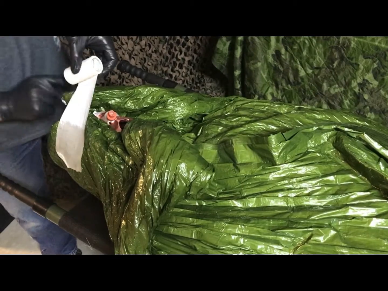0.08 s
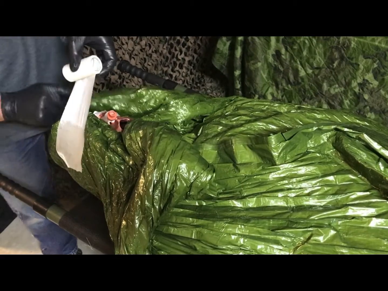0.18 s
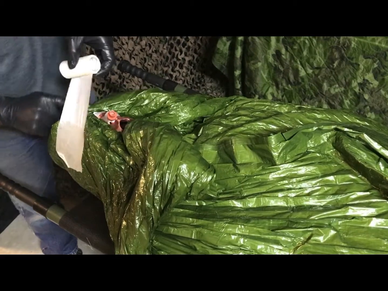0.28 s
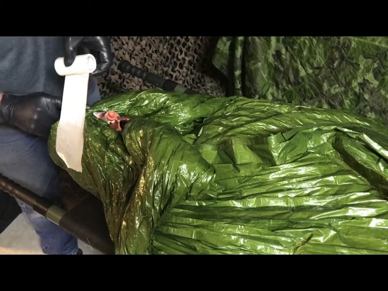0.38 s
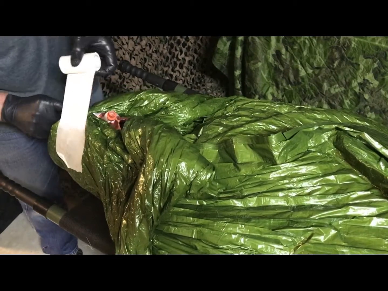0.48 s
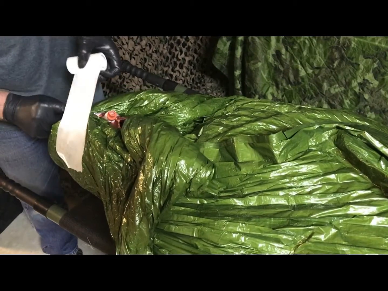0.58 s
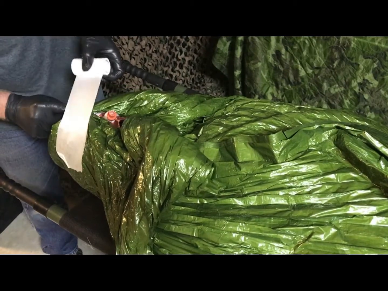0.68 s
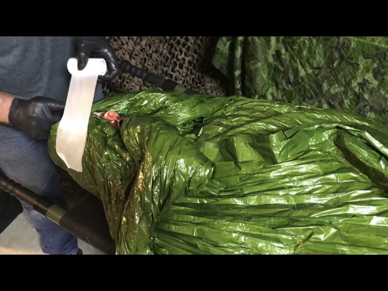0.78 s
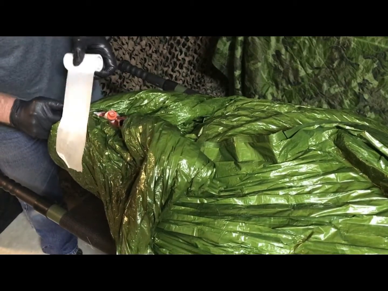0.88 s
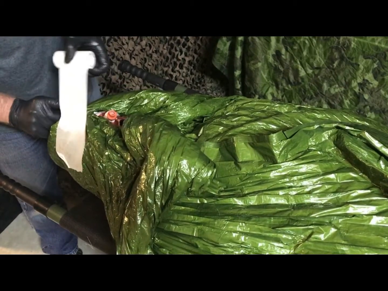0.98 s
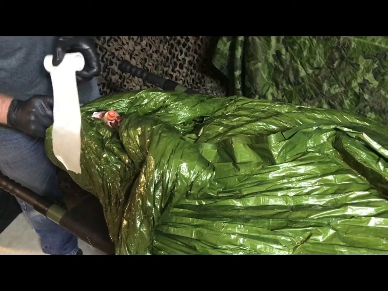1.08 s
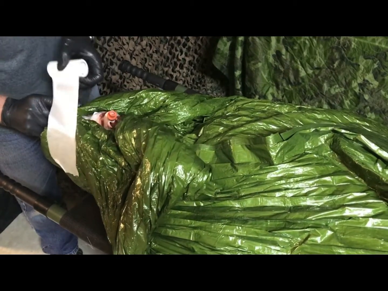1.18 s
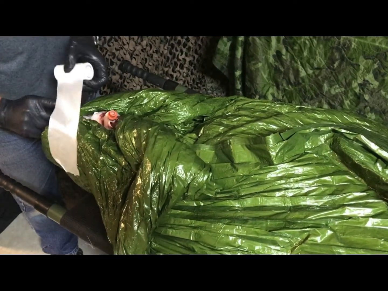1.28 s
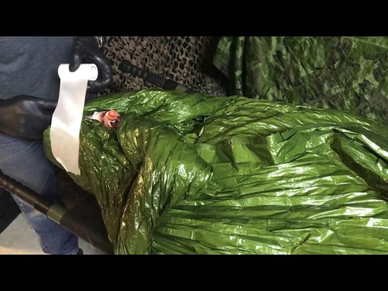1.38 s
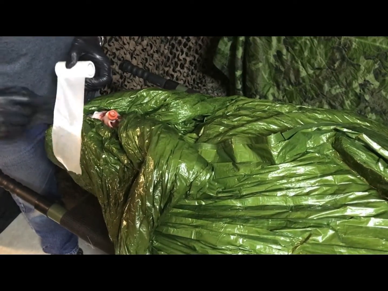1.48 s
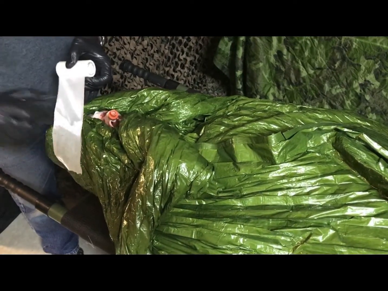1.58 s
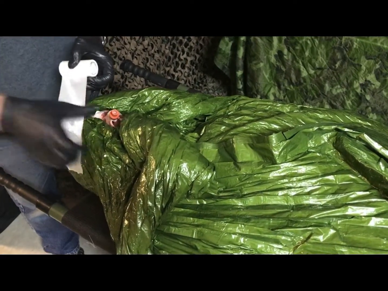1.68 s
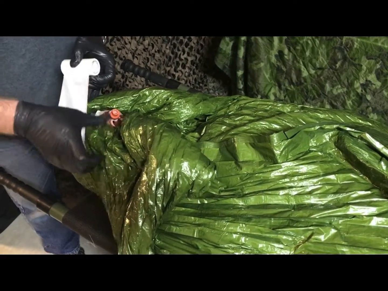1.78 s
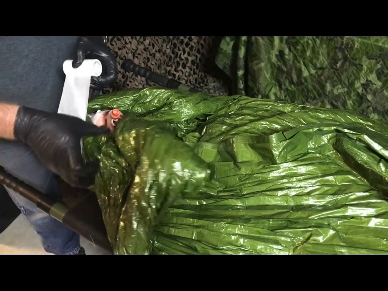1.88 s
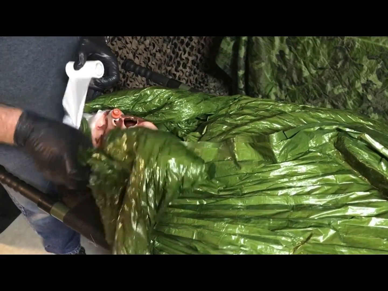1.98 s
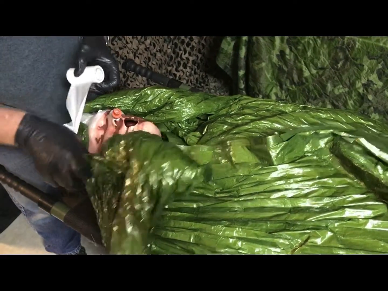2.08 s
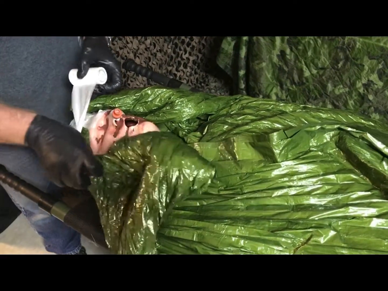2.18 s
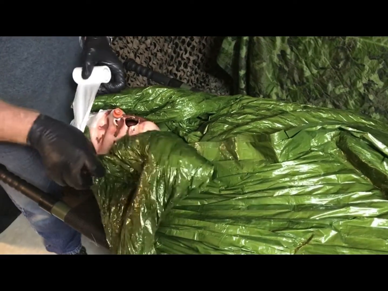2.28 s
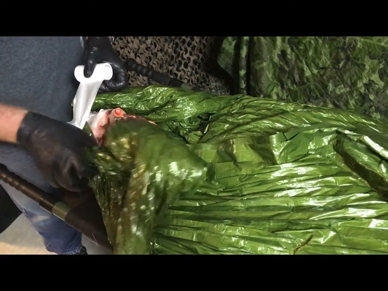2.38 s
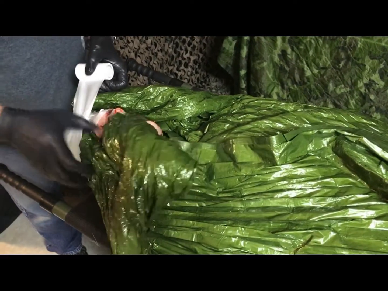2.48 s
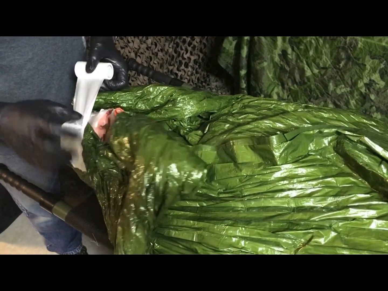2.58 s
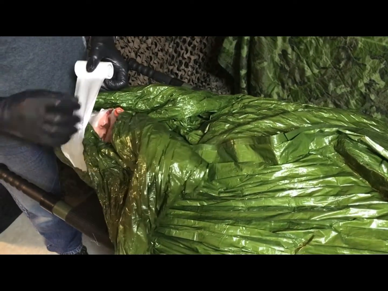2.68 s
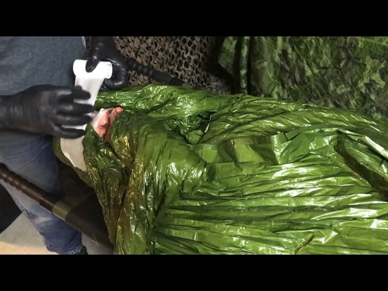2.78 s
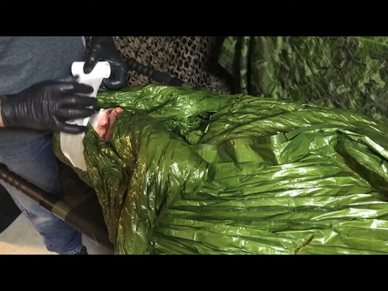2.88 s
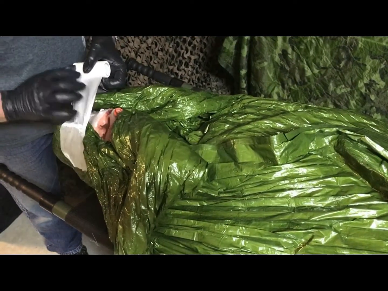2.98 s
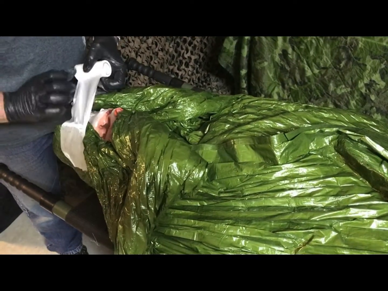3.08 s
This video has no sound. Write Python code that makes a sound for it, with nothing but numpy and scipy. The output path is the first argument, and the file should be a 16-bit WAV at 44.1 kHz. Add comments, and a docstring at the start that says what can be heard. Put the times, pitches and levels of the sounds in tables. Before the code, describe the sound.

Crinkly plastic film is pulled and folded around a dummy, heard close with short room reverberation; soft crackle leads to rapid hollow pops, brief ratcheting, near quiet, then vigorous crisp rustling and a few last pops.

```python
"""Faint fine crackle and ticks over a soft background, then crumpling, pops and quick ratcheting runs.
A thin reflective plastic blanket is pulled tight around a training dummy in a small room.
Creases and broader folds are random grains of coloured noise; single creases are short bright bursts.
Where the film is taut it sticks and slips: each slip is a falling sine, a noise crack and a low thud."""
import sys
import numpy as np
from scipy import signal
from scipy.fft import rfft, irfft
from scipy.io import wavfile
from scipy.ndimage import uniform_filter1d

SR = 44100
rng = np.random.default_rng(int(sys.argv[2]) if len(sys.argv) > 2 else 0)


def bounce(signal):
    """Save signal as a 16-bit WAV file at the path given by the first command-line argument."""
    frames = np.transpose(np.atleast_2d(signal))
    limited = np.clip(frames, -1, 1)
    pcm = np.round(limited * 32767).astype(np.int16)
    wavfile.write(sys.argv[1], SR, pcm)


N = 138915  # samples

# background spectrum: freq_hz, density_db_per_hz (relative)
AIR_SPECTRUM = [(20, -20), (32, -12), (45, -4.5), (70, 0), (130, -6.5), (300, -7.5), (1000, -16),
                (4000, -11), (15000, -73)]
AIR_DB = -55

# handling of the film, three successive stretches: time_s, fine_crackle_db, folds_db
SETTLING = [(0, -47.5, -54.5), (.1, -51.5, -58), (0.179, -47, -56), (.205, -34, -40.5), (.255, -39, -43),
            (0.296, -33, -39), (.325, -36, -39.5), (.355, -34, -37.5), (.39, -39, -43.5),
            (.47, -41.5, -47.5), (0.529, -38, -42.5), (.61, -33.5, -40), (.68, -34, -43.5),
            (.78, -34.5, -39.5)]
TIGHTENING = [(.85, -40, -27.5), (.93, -42.5, -39.5), (1.04, -42.5, -44.5), (1.12, -38, -43),
              (1.165, -35.5, -34), (1.24, -34, -35), (1.275, -41, -41.5), (1.33, -35.5, -40),
              (1.4, -41, -42.5), (1.48, -40.5, -37.5), (1.56, -44.5, -50), (1.68, -50, -58.5),
              (1.791, -50.5, -56)]
FOLDING = [(1.811, -32.5, -36.5), (1.85, -30.5, -42), (1.88, -28.5, -36.5), (1.98, -29.5, -36.5),
           (2.049, -21.5, -34.5), (2.141, -30, -39), (2.19, -27, -29.5), (2.27, -28, -39),
           (2.349, -33, -36), (2.409, -27, -37.5), (2.5, -30.5, -37), (2.591, -34, -36),
           (2.615, -39.5, -50), (2.7, -42, -49.5), (2.8, -41, -51), (2.87, -39, -46), (2.98, -41, -49),
           (3.15, -43.5, -52.5)]
# spectrum of the fine crackle: freq_hz, density_db_per_hz (relative)
FINE_SPECTRUM = [(300, -12), (1200, -11), (2800, 1.5), (4000, -5.5), (5500, 0), (7000, 0), (9000, -2.5),
                 (10400, -9.5), (12800, -0.5), (15500, -7.5)]
# spectrum of the crumpling folds: freq_hz, density_db_per_hz (relative)
FOLDS_SPECTRUM = [(40, -36), (90, 0), (140, -0.5), (280, -4), (480, -3.5), (700, 0), (1200, .5),
                  (2000, 1.5), (2900, -9.5), (4000, -5), (9000, -60)]
# faster handling makes more snaps: the two rates hold where the fine crackle is at CROWDING_AT_DB
FINE_PER_S, FOLDS_PER_S = 4500, 1500
CROWDING_DB_PER_DB, CROWDING_AT_DB = .75, -35.5
FINE_SPREAD_DB, FOLDS_SPREAD_DB = 3, 2
GRAIN_DECAY_S, CLUMP_S, CLUMP_DB = .00045, .004, 2
BIGGEST_GRAIN = 3.2  # size cap, in spreads
# air stirred by the sheet; level relative to the fine crackle
RUMBLE_HZ, RUMBLE_WIDTH_OCT, RUMBLE_DB = 55, .36, -32.5

# single creases snapping: start_s, level_db (before halving in ticks), centre_hz
TICKS = [(.0192, -27, 5300), (0.031, -25, 6000), (.0488, -26, 14080), (0.1332, -23, 10900),
         (.134, -23, 1180), (0.164, -22, 4500), (0.3355, -11.5, 5500), (0.4133, -20.5, 10000),
         (.7245, -17, 12000), (0.771, -12, 9900), (1.591, -29, 8000), (1.6375, -22, 4500),
         (1.646, -23.5, 4470), (1.6744, -28, 8000), (1.7968, -17, 11000), (1.815, -16, 7900),
         (1.8303, -14, 7050), (1.8826, -13.5, 7440), (1.937, -9, 7000), (1.9546, -18, 8000),
         (2.595, -12.5, 6500), (2.747, -17.5, 5430), (2.8762, -27, 12000)]
TICK_DECAY_S, TICK_WIDTH_OCT = .00071, .73

# bunches of folds giving way: middle_s, sigma_s, level_db, centre_hz, width_oct
CRUNCHES = [(.22, 0.0078, -29, 5660, 0.45), (0.222, 0.022, -38, 1740, 0.38), (1.913, .011, -26, 1300, 0.96),
            (2.049, 0.019, -24.5, 1065, 0.61), (2.273, 0.0094, -29.5, 1610, 0.62),
            (2.367, 0.0036, -28, 1060, .45), (2.393, .006, -27, 1040, .55),
            (2.549, 0.0038, -26.5, 1800, 0.89)]
CRUNCH_PER_S, CRUNCH_SPREAD_DB = 4000, 3.5

# pops of the taut film: start_s, wave_peak_db, pitch_hz, crack_db, thud_db
POPS = [(0.79, -17.5, 640, -18, -38), (0.8025, -24, 686, -18.5, -49), (.8096, -7.5, 1820, -12.5, -34),
        (0.8107, -8, 447, -13, -33), (0.8276, -7.5, 563, -13, -26.5), (0.845, -9.5, 710, -14, -31.5),
        (0.8618, -8, 640, -15.5, -30.5), (0.8876, -12, 660, -16.5, -35), (1.0562, -13, 670, -18, -31),
        (1.1387, -19.5, 550, -24, -31.5), (1.1547, -19.5, 620, -29, -43), (1.3424, -23.5, 710, -21, -36),
        (1.3585, -20.5, 700, -19, -35.5), (1.8106, -22.5, 880, -21.5, -52), (2.1931, -20.5, 1390, -16, -31),
        (2.199, -25, 1400, -15, -39), (2.3335, -22, 730, -27, -40), (2.4, -20, 850, -17, -34.5),
        (2.5812, -15.5, 1200, -23, -48), (2.589, -16, 615, -12, -40), (2.5934, -17.5, 635, -12.5, -33),
        (2.7646, -30.5, 1500, -29, -69), (2.8373, -17.5, 656, -21.5, -41), (2.853, -20.5, 640, -23.5, -44),
        (2.8594, -22, 610, -19, -42)]
# ratcheting runs: start_s, length_s, first_gap_s, last_gap_s, wave_peak_db, pitch_hz, crack_db, thud_db
RUNS = [(1.2904, .041, .0042, .0105, -21, 720, -23, -35.5),
        (1.4385, .027, .0042, .0018, -22.5, 1110, -24, -44)]
# spectrum of the crack: freq_hz, density_db_per_hz (relative)
CRACK_SPECTRUM = [(500, -22), (1500, -6.5), (2300, 7), (3500, -6), (6200, 2), (8500, -0.5), (10400, -10.5),
                  (13000, 0), (16000, -10.5)]
# spectrum of the thud: freq_hz, density_db_per_hz (relative)
THUD_SPECTRUM = [(60, -19), (105, -13.5), (140, 1.5), (195, 2), (300, -4.5), (450, -3.5), (640, -7.5),
                 (900, -14), (2500, -27.5)]
POP_RISE_S, POP_TOP_HZ, POP_GLIDE_S = .00056, 3160, .00048
CRACK_DECAY_S, THUD_DECAY_S = .00094, .016
SLIP_SCATTER_DB, SLIP_DETUNE, MIN_GAP_S = 1.1, .12, .001
RUN_BEND = 1.3  # the gaps change mostly late in a run

# close reflections: delay_s, gain
ECHOES = [(.0032, 0.1025), (.0068, 0.1752), (0.0141, 0.1467), (0.0167, -0.158)]
# reverberation time: freq_hz, t60_s
ROOM_T60 = [(150, .36), (500, 0.39), (1100, 0.42), (2800, 0.38), (7000, 0.4), (15000, 0.32)]
# colour of the reverberant tail: freq_hz, gain_db
ROOM_COLOUR = [(100, -26.5), (400, -1), (560, 0.5), (635, 3), (710, 3), (900, -3), (1170, 3.5),
               (1500, -0.5), (2050, -4), (3200, -7), (12000, -7.5)]
POP_ROOM_DB, FILM_ROOM_DB = -4.5, -6  # tail gain, on top of ROOM_COLOUR
TAPS_PER_S, MIXING_S = 900, .035  # reflections start sparse and thicken
DIRECT_DELAY_S = .000089

EDGE_HZ = 16030


def amp(db):
    """Decibels to gain."""
    return 10 ** (np.asarray(db) / 20)


def unit(x):
    """Scale to an rms of one."""
    return x / np.sqrt(np.mean(x ** 2) + 1e-20)


def read(points, hz):
    """Interpolate a table on a log-frequency axis."""
    f, value = np.transpose(points)
    return np.interp(np.log(hz + 1), np.log(f), value)


def add(mix, start_s, sound):
    """Mix a sound in at start_s."""
    part = mix[max(round(start_s * SR), 0):][:len(sound)]
    part += sound[:len(part)]


def hump(centre_hz, width_oct):
    """Bell-shaped spectrum; power falls to 1/e at width_oct from the centre."""
    f = np.geomspace(20, SR / 2, 80)
    octaves_off = np.log2(f / centre_hz)
    db = -10 / np.log(10) * (octaves_off / width_oct) ** 2
    return np.transpose([f, np.maximum(db, -60)])


def colour(x, points, size=2048):
    """Causal (minimum-phase) filter of unit energy with the given spectrum."""
    log_gain = np.log(amp(read(points, abs(np.fft.fftfreq(size, 1 / SR)))))
    response = np.exp(np.conj(signal.hilbert(log_gain)))
    taps = np.fft.ifft(response).real[:size // 2]
    return signal.fftconvolve(x, taps / np.linalg.norm(taps))[:len(x)]


def burst(spectrum, decay_s):
    """Short decaying burst of coloured noise, starting at about unit size."""
    t = np.arange(0, .12, 1 / SR)
    fade = np.exp(-t / decay_s)
    noise = rng.choice([-1, 1], len(t)) * fade
    return unit(colour(noise, spectrum)) * np.sqrt(np.mean(fade ** 2))


def grains(per_s, spread_db, count=14):
    """Random clumped snaps of uneven size and colour; even in level at any rate."""
    clumps = unit(uniform_filter1d(rng.standard_normal(N), max(round(CLUMP_S * SR), 1)))
    size_db = spread_db * np.minimum(rng.exponential(1, N), BIGGEST_GRAIN) + CLUMP_DB * clumps
    fires = rng.random(N) < per_s / SR
    snaps = amp(size_db) * rng.choice([-1, 1], N) * fires / np.sqrt(per_s)
    crease = rng.integers(0, count, N)
    t = np.arange(256) / SR
    noise = rng.standard_normal((count, len(t))) * np.exp(-t / GRAIN_DECAY_S)
    spectra = rfft(noise, 1024)
    # the shapes differ in colour but are flat on average
    shapes = irfft(spectra / np.sqrt(np.mean(abs(spectra) ** 2, 0)))[:, :len(t)]
    return unit(sum(signal.oaconvolve(snaps * (crease == k), shapes[k])[:N] for k in range(count)))


def background():
    """Faint steady coloured noise."""
    return amp(AIR_DB) * unit(colour(rng.standard_normal(N), AIR_SPECTRUM))


def rustle():
    """Fine crackle, duller crumpling and a little stirred air follow the handling of the film."""
    time_s, *levels = np.transpose(SETTLING + TIGHTENING + FOLDING)
    fine_db, folds_db = (np.interp(np.arange(N) / SR, time_s, db) for db in levels)
    crowd = amp(CROWDING_DB_PER_DB * (fine_db - CROWDING_AT_DB))
    fine = unit(colour(grains(FINE_PER_S * crowd, FINE_SPREAD_DB), FINE_SPECTRUM))
    folds = unit(colour(grains(FOLDS_PER_S * crowd, FOLDS_SPREAD_DB), FOLDS_SPECTRUM))
    rumble = colour(rng.standard_normal(N), hump(RUMBLE_HZ, RUMBLE_WIDTH_OCT), size=8192)
    rumble = amp(RUMBLE_DB) * unit(rumble)
    return (fine + rumble) * amp(fine_db) + folds * amp(folds_db)


def ticks():
    """Single creases flip over with a bright tick."""
    out = np.zeros(N)
    for start_s, level_db, centre_hz in TICKS:
        tick = burst(hump(centre_hz, TICK_WIDTH_OCT), TICK_DECAY_S)
        add(out, start_s, .5 * amp(level_db) * tick)
    return out


def crunches():
    """Short swells of dense snaps as a bunch of folds collapses."""
    t = np.arange(N) / SR
    snaps = grains(CRUNCH_PER_S, CRUNCH_SPREAD_DB)
    out = np.zeros(N)
    for middle_s, sigma_s, level_db, centre_hz, width_oct in CRUNCHES:
        swell = np.exp(-.5 * ((t - middle_s) / sigma_s) ** 2)
        out += amp(level_db) * swell * unit(colour(snaps, hump(centre_hz, width_oct)))
    return out


def pop(wave_db, pitch_hz, crack_db, thud_db):
    """A slip: crack, bending wave (highs first) and a soft low thud, mostly the small room resonating."""
    thud = amp(thud_db) * burst(THUD_SPECTRUM, THUD_DECAY_S)
    crack = amp(crack_db) * burst(CRACK_SPECTRUM, CRACK_DECAY_S)
    t = np.arange(len(thud)) / SR
    glide_hz = pitch_hz + (POP_TOP_HZ - pitch_hz) * np.exp(-t / POP_GLIDE_S)
    turns = np.cumsum(glide_hz) / SR
    envelope = t / POP_RISE_S * np.exp(1 - t / POP_RISE_S)  # peaks at 1
    wave = amp(wave_db) * envelope * np.sin(2 * np.pi * turns)
    return wave + crack + thud


def slips():
    """Stick-slip of the taut film: single pops, and runs of them that slow down or speed up."""
    out = np.zeros(N)
    for start_s, *blow in POPS:
        add(out, start_s, pop(*blow))
    for start_s, length_s, first_gap_s, last_gap_s, wave_db, pitch_hz, crack_db, thud_db in RUNS:
        elapsed_s = 0
        while elapsed_s < length_s:
            scatter, detune = rng.standard_normal(2)
            slip = pop(wave_db, pitch_hz * np.exp(SLIP_DETUNE * detune), crack_db, thud_db)
            add(out, start_s + elapsed_s, amp(SLIP_SCATTER_DB * scatter) * slip)
            progress = (elapsed_s / length_s) ** RUN_BEND
            gap_s = first_gap_s * (last_gap_s / first_gap_s) ** progress
            elapsed_s += max(gap_s, MIN_GAP_S)
    return out


def room(x, tail_db):
    """Direct sound, a few close reflections and a short tail that thickens as it dies."""
    age_s = np.arange(SR // 2) / SR
    chance = np.minimum(TAPS_PER_S / SR * (1 + (age_s / MIXING_S) ** 2), 1)
    hits = rng.random(len(age_s)) < chance
    taps = rng.choice([-1, 1], len(age_s)) * hits / np.sqrt(chance) * (age_s > .003)
    # each band decays 60 dB in its own t60
    hz, t, bands = signal.stft(taps, SR, nperseg=256)
    decay = amp(-60 * t / read(ROOM_T60, hz)[:, None])
    tail = signal.istft(bands * decay, SR, nperseg=256)[1]
    tint = amp(read(ROOM_COLOUR, np.fft.rfftfreq(SR, 1 / SR)))
    tail = irfft(rfft(tail / np.linalg.norm(tail), SR) * tint)[:len(age_s)]
    response = amp(tail_db) * tail
    for delay_s, gain in [(DIRECT_DELAY_S, 1)] + ECHOES:
        add(response, delay_s, np.array([gain]))
    return signal.fftconvolve(x, response)[:N]


def scene():
    """The film in the room, over a faint background; one channel."""
    air = background()
    film = room(rustle() + ticks() + crunches(), FILM_ROOM_DB)
    return (air + film + room(slips(), POP_ROOM_DB))[None]


def record(dry):
    """The recorder's band limit: a linear-phase low-pass at EDGE_HZ."""
    taps = signal.firwin(511, EDGE_HZ, window=("kaiser", 9), fs=SR)
    return signal.oaconvolve(dry, taps[None], "same")


dry = scene()
out = record(dry)
bounce(out)
```